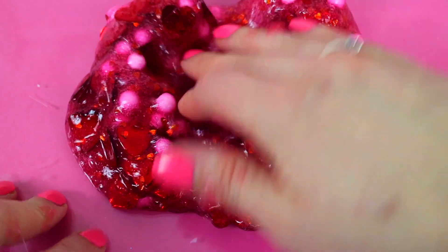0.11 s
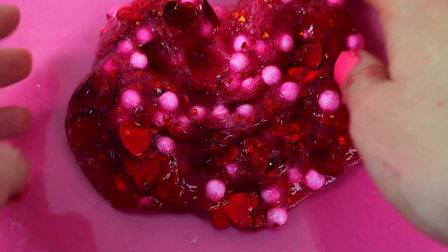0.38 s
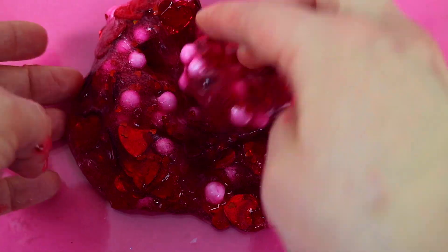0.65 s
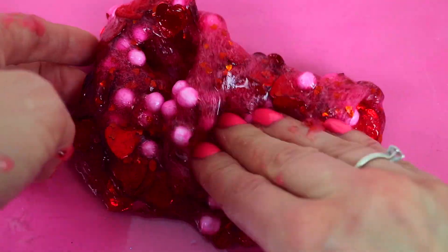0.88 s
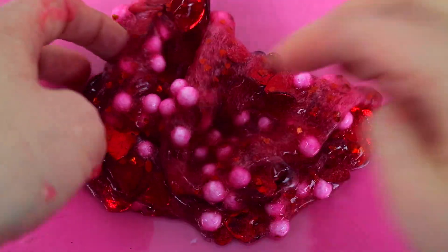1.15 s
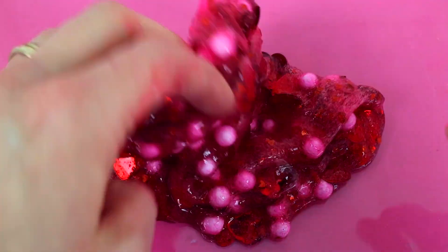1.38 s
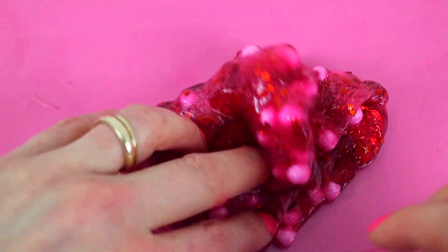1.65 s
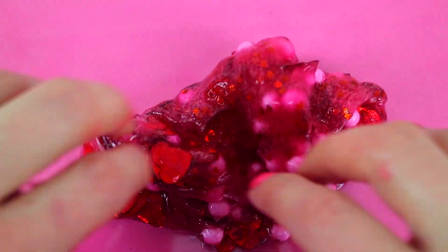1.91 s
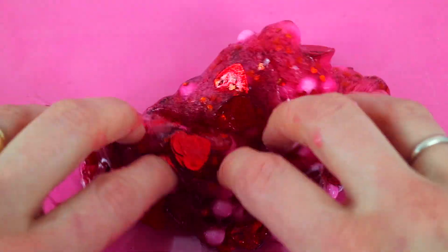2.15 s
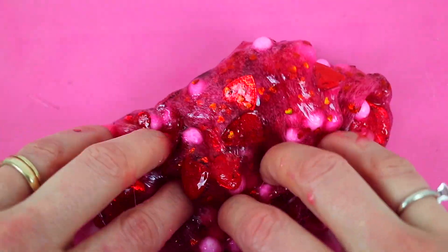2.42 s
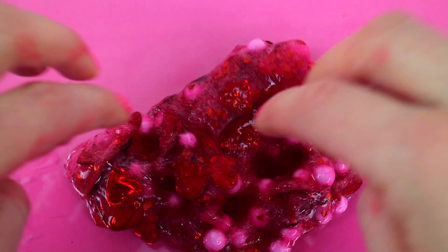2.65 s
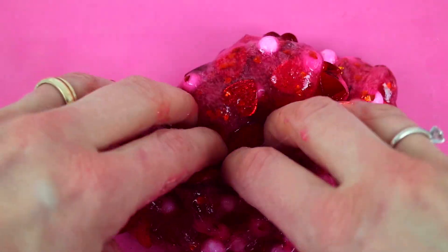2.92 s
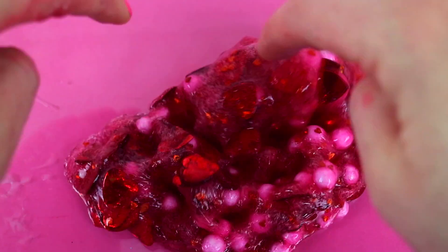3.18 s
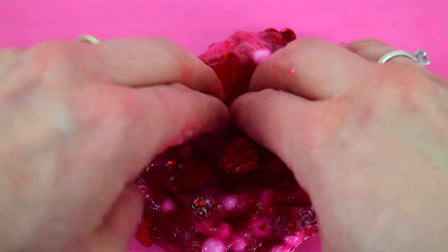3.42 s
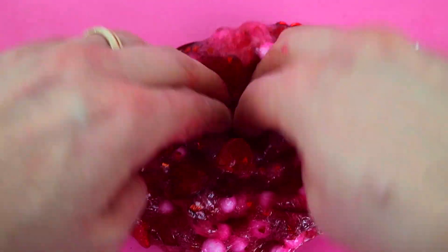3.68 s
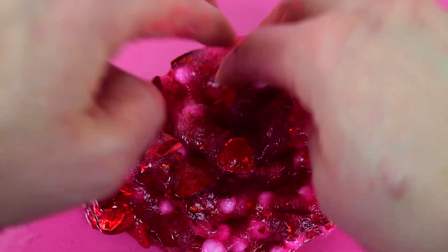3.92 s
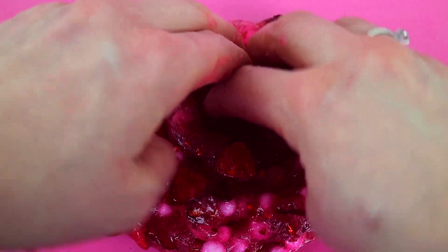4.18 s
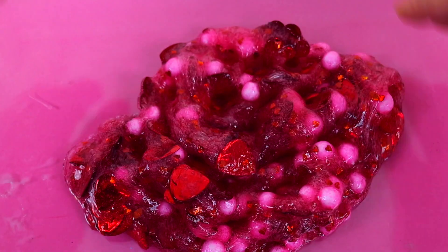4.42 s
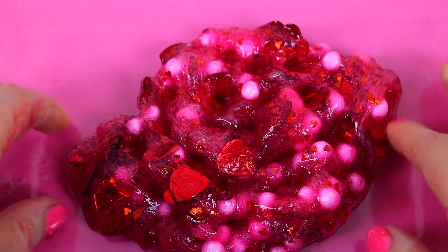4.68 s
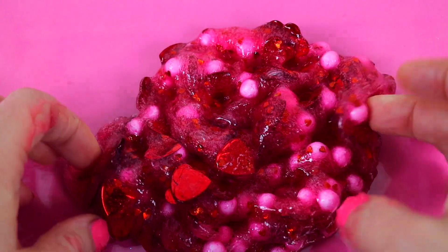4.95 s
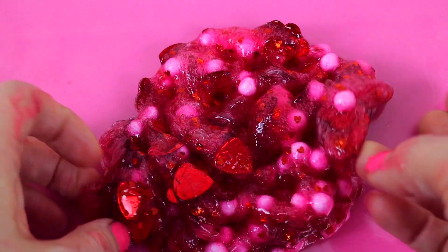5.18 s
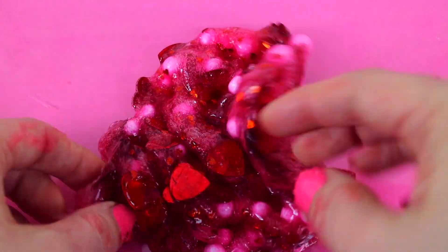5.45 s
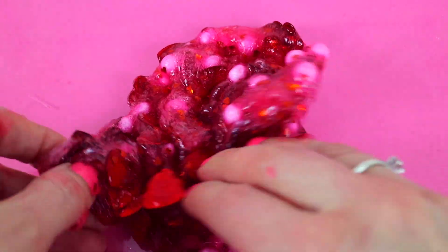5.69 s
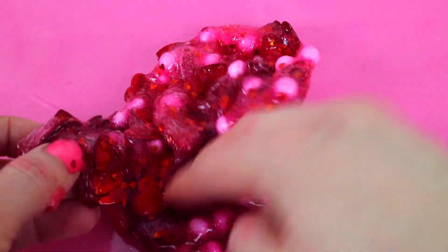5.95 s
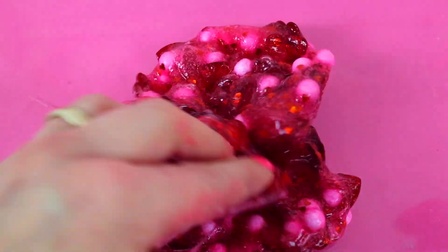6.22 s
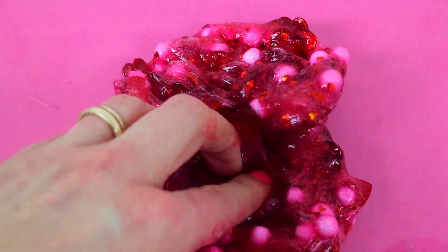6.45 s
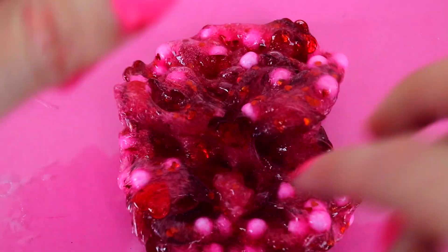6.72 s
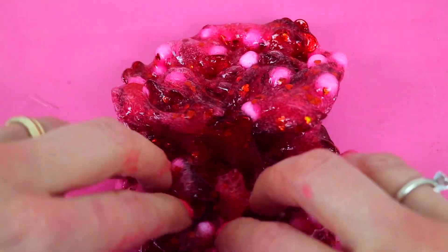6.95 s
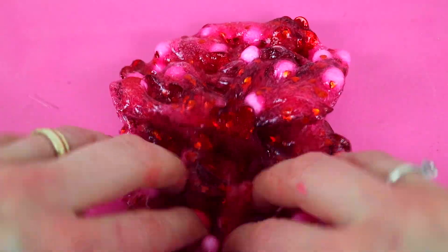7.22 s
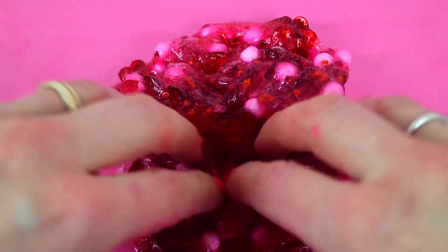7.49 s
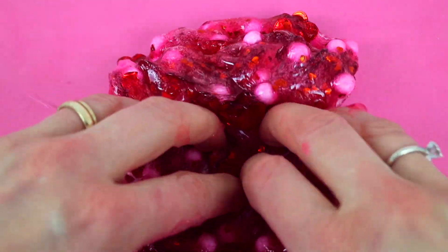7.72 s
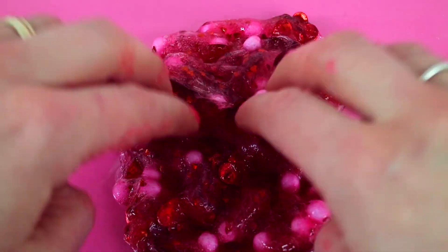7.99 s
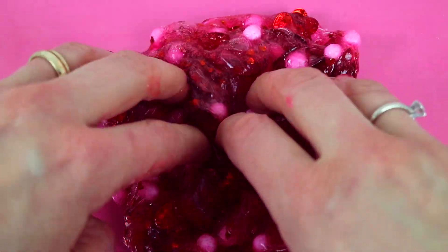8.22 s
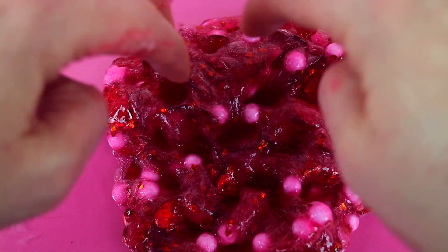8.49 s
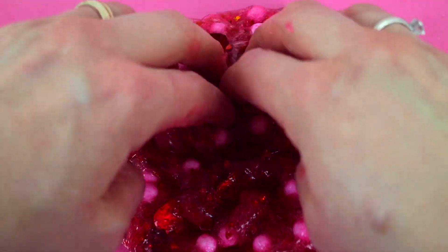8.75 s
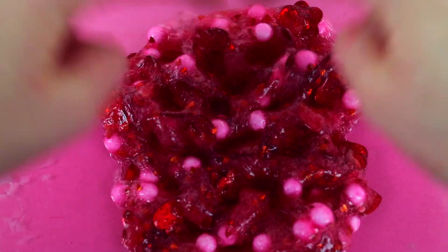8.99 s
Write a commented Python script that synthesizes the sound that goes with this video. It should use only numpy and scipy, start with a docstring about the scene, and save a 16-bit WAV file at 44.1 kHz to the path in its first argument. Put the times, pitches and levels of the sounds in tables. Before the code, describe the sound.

Close-up slime squishing: irregular bursts of crisp crackles, loud air-bubble pops and wet peeling, with soft finger thumps and faint hiss between.

```python
"""Kneading a sticky foam-ball slime

Hands knead, squeeze and pull a sticky slime full of foam balls on a table, close in front of the microphone.
Trapped air pockets burst: shaped noise makes the bright snap, a sagging tone the short hollow ring.
Between them peeling strands crackle, as random clicks exciting short resonances.
Fingers thump the table top, whose modes ring; a small room answers the slime with a short noise tail.
Hiss with a faint narrow hum lies beneath, swelling and sinking."""
import sys
import numpy as np
from scipy import signal
from scipy.fft import rfft, irfft
from scipy.io import wavfile

SR = 44100
rng = np.random.default_rng(int(sys.argv[2]) if len(sys.argv) > 2 else 0)


def wav_out(sig):
    """Save sig, one row per channel (or a flat mono array), as 16-bit PCM at SR to the path in sys.argv[1]."""
    wavfile.write(sys.argv[1], SR, np.round(np.clip(np.atleast_2d(sig).T, -1, 1) * 32767).astype(np.int16))


def voltage_ratio(decibels):
    """Convert decibels (scalar or array-like) to amplitude ratios, 20 dB per decade."""
    exponent = np.asarray(decibels, float) / 20
    return 10 ** exponent


N = 402191  # length [samples]

# Film over an air pocket tearing: (time [s], peak level [dB], pitch [Hz])
FILM_SNAPS = [(0.0134, 0.5, 13000), (0.0647, -7.5, 9200), (0.2079, -11, 11600), (0.5115, -10, 9700),
              (0.5503, -3.5, 6200), (0.5775, -0.5, 3800), (0.622, -9.5, 5350), (0.6893, -5, 11300),
              (0.8532, -8, 14200), (0.948, -20.5, 3000), (0.976, -18, 2470), (0.996, -22, 5500),
              (1.0205, -20, 14020), (1.072, -27, 3330), (1.083, -23.5, 9900), (1.1633, -11.5, 9200),
              (1.1748, -7, 7820), (1.2293, -18.5, 11500), (1.2834, -19, 11100), (1.314, -22, 4540),
              (1.336, -24, 11100), (1.408, -21.5, 3380), (1.4271, -19, 7360), (1.501, -29, 3000),
              (1.538, -21.5, 8600), (1.6227, -23, 13100), (1.662, -4.5, 8700), (1.7165, -7.5, 8140),
              (1.8143, -8.5, 12320), (1.8231, -3, 8560), (1.865, -11, 7000), (1.8794, 4.5, 7420),
              (1.919, -18, 3940), (2.116, -34.5, 5500), (2.274, -20, 10060), (2.299, 10.5, 14600),
              (2.34, -5.5, 8600), (2.4605, -19, 9200), (2.5943, -7, 9790), (2.6135, 6.5, 4450),
              (2.8958, -28, 2800), (2.923, -17.5, 13800), (2.9982, -1, 12000), (3.175, -1, 10800),
              (3.1927, 1, 7800), (3.2133, -1.5, 3830), (3.5239, -30.5, 8850), (3.5604, -28, 5100),
              (3.792, -7, 3820), (3.8214, -14, 7900), (4.0853, -29.5, 5580), (4.239, -12, 11500),
              (4.2496, 0, 10800), (4.34, -2, 9100), (4.9388, -14, 14700), (5.2559, -10.5, 3900),
              (5.3084, -13.5, 12600), (5.362, -23, 3700), (5.3776, -9.5, 13000), (5.4566, -14.5, 11500),
              (5.48, -7.5, 13100), (5.515, -4.5, 13000), (5.573, -13.5, 5150), (5.636, -16.5, 14300),
              (5.53, -20, 6500), (5.664, -19.5, 3160), (5.8251, -15, 10600), (5.8465, -1.5, 8900),
              (5.855, -12, 11170), (5.8744, 15.5, 9160), (6.0356, -5, 10100), (6.0495, -3.5, 4500),
              (6.0538, 2.5, 4070), (6.0747, -1, 6940), (6.194, -24, 7800), (6.2976, -30, 3350),
              (6.386, -30, 3830), (6.418, -29, 4200), (6.498, -32.5, 6000), (6.5424, -37, 3360),
              (6.61, -29.5, 5240), (6.6578, 1.5, 7660), (6.684, -1, 5630), (6.784, -12, 3750),
              (7.1051, -29, 6460), (7.2268, -10.5, 11600), (7.242, -11, 6660), (7.3373, -0.5, 9860),
              (7.3582, -3, 9900), (7.888, -13.5, 7460), (7.909, 0.5, 7550), (8.188, -31, 8000),
              (8.2058, -20, 13500), (8.2605, -8.5, 10800), (8.291, -21.5, 7000), (8.4494, -11, 11700),
              (8.4635, -13, 3400), (8.485, -12, 6100), (8.4899, -2.5, 8400), (8.7442, -7, 12300),
              (8.837, -28, 3460), (8.9611, -22, 8850), (9.03, -14, 10600), (9.0376, -5.5, 5240),
              (9.067, -17, 2800)]
# Larger pockets emptying with a hollow pop: (time [s], peak level of the ring [dB], pitch [Hz])
HOLLOW_POPS = [(0.5797, -10, 1630), (0.6066, -19, 1100), (0.7104, -19.5, 1530), (0.9078, -25.5, 1170),
               (0.92, -22.5, 950), (0.968, -19.5, 1000), (0.99, -20, 785), (1.335, -34, 870),
               (1.367, -30.5, 900), (1.4097, -30, 1340), (1.428, -25.5, 1600), (1.826, -18, 1270),
               (1.8805, -10, 583), (2.369, -27, 1200), (2.598, -13.5, 895), (2.6327, -15.5, 1770),
               (2.641, -12, 864), (3.178, -9.5, 1370), (3.1974, -5, 940), (3.2127, -8.5, 825),
               (3.6929, -13, 765), (3.7915, -14.5, 1576), (5.092, -40, 920), (5.155, -40, 1090),
               (5.2, -29, 1100), (5.248, -27.5, 910), (5.2553, -14.5, 588), (5.306, -30, 966),
               (5.455, -28, 1290), (5.474, -21.5, 1035), (5.565, -23, 1300), (5.581, -24.5, 900),
               (5.636, -29, 1020), (5.8756, -13, 955), (6.0338, -3, 1070), (6.0774, -16, 970),
               (6.641, -22.5, 988), (7.26, -23, 1065), (7.338, -7.5, 832), (7.694, -31, 920),
               (7.7827, -23.5, 670), (7.891, -18, 1010), (7.911, -15.5, 871), (8.241, -22.5, 917),
               (8.306, -29.5, 1200), (8.319, -30.5, 1100), (8.367, -19.5, 880), (8.4497, -12, 936),
               (8.472, -18.5, 1120), (8.4834, -6.5, 727), (8.4889, -7.5, 1280), (8.5034, -12, 950),
               (8.884, -28.5, 793), (9.03, -11, 910), (9.0396, -16.5, 588)]
# Fingers working the slime until they let go:
# (touch time [s], release time [s], crackle level at release [dB], squelch level at release [dB])
KNEAD_STROKES = [(0.059, 0.227, -55, -63), (0.286, 0.561, -57.5, -56), (0.581, 0.662, -39, -42),
                 (0.793, 1.162, -47, -51), (1.237, 1.842, -46.5, -49.5), (1.991, 2.598, -52.5, -55),
                 (2.863, 3.181, -50.5, -51.5), (3.499, 3.783, -55, -55), (4.048, 4.348, -53.5, -54),
                 (4.764, 4.867, -46.5, -52), (4.93, 5.25, -49, -53), (5.257, 5.608, -41.5, -43.5),
                 (5.611, 5.858, -44, -49.5), (5.899, 6.054, -53, -56.5), (6.143, 6.65, -54.5, -60),
                 (7.093, 7.328, -50.5, -62), (7.587, 7.835, -54, -52.5), (8.113, 8.447, -52, -52),
                 (8.806, 9.035, -51.5, -50.5)]
# A finger or fold tearing free: (time [s], crackle level [dB], squelch level [dB])
TEARING_PULLS = [(0.02, -40, -43), (0.22, -33, -40.5), (0.578, -32, -29), (0.707, -33, -37),
                 (1.172, -29, -34.5), (1.427, -40, -49), (1.72, -35, -39), (1.872, -24.5, -32.5),
                 (2.321, -39.5, -47.5), (2.61, -27.5, -30.5), (3.078, -51.5, -58), (3.193, -26, -37.5),
                 (3.815, -28.5, -30.5), (4.361, -30.5, -35.5), (5.098, -41, -45.5), (5.275, -45, -39.5),
                 (5.536, -39, -58), (5.877, -41, -42.5), (6.055, -39, -37.5), (6.639, -40, -48),
                 (6.67, -43.5, -40.5), (7.248, -44.5, -39.5), (7.348, -36, -35.5), (7.8, -43, -47),
                 (7.911, -28.5, -36), (8.35, -51, -38.5), (8.492, -26.5, -26.5), (9.041, -27, -27.5)]
# Strands catching at first touch: (crackle rise [dB/s], squelch rise [dB/s], lone tick rise [dB/s])
CATCH_RATES = (1600, 1200, 1600)
# The last strands letting go: (crackle fall [dB/s], squelch fall [dB/s], lone tick fall [dB/s])
RELEASE_RATES = (348.5, 276.5, 801)
# Slime left alone, before the mixing gains: (crackle level [dB], squelch level [dB], lone tick level [dB])
RESTING_LEVELS = (-69, -75.5, -71.5)
# Fingers pressing on the table: (time [s], knock level before the mode gains [dB])
FINGER_THUMPS = [(0.222, -27), (0.407, -26), (1.18, -25), (2.606, -21), (2.964, -26.5), (3.067, -26.5),
                 (4.195, -28), (4.398, -27.5), (4.756, -26), (4.851, -39.5), (5.255, -29.5), (5.385, -24),
                 (5.66, -28.5), (5.944, -30.5), (6.232, -34), (6.502, -41.5), (7.781, -32.5),
                 (7.828, -31.5), (9.035, -25.5)]
# Modes of the table top: (frequency [Hz], level [dB], time to die by 60 dB [s])
TABLE_MODES = [(121, -4.5, 0.0097), (195.2, -7.5, 0.041), (316, -8.5, 0.025), (560, -0.5, 0.0046)]
# Reverberation of the small room: (band frequency [Hz], time to die by 60 dB [s], tail level [dB])
ROOM_BANDS = [(288, 0.037, -20.5), (878, 0.31, -13), (1970, 0.12, -30), (3940, 0.18, -16),
              (8300, 0.31, -19), (12800, 0.12, -16)]
# Spectrum of the quiet room and microphone hiss: (frequency [Hz], relative density [dB per Hz])
HISS_SPECTRUM = [(30, 4.5), (90, -1.5), (550, -7), (950, -14), (2000, -17.5), (12000, -21.5),
                 (16000, -31.5)]
# The background swelling and sinking: (time [s], level of the hiss [dB])
AIR_SWELLS = [(0, -55.5), (2.298, -59), (3.3, -69.5), (4.0, -64), (4.7, -60.5), (5.8, -58.5), (6.85, -71),
              (9.12, -62)]


def rms_one(x):
    """Normalization: scale a signal to unit root-mean-square value."""
    return x / np.sqrt(np.mean(x ** 2) + 1e-20)


def band(x, low_hz, high_hz):
    """Band-pass filtering by a second-order Butterworth design."""
    edges = np.clip([low_hz, high_hz], 15, .45 * SR)
    return signal.sosfilt(signal.butter(2, edges, "band", fs=SR, output="sos"), x)


def ring(clicks, hz, t60):
    """Damped resonance: a unit click sets a tone of height 1 ringing, with nothing far below it."""
    radius = voltage_ratio(-60 / (t60 * SR))
    angle = 2 * np.pi * hz / SR
    return signal.lfilter([.5, 0, -.5], [1, -2 * radius * np.cos(angle), radius ** 2], clicks + 1e-18)


def drift(rate_hz):
    """Slow random fluctuation of unit spread: white noise through a double low-pass pole."""
    pole = np.exp(-2 * np.pi * rate_hz / SR)
    slow = signal.lfilter([1], [1, -2 * pole, pole ** 2], rng.standard_normal(N + SR))
    return rms_one(slow[SR:])  # the filter has settled after the first second


def add(out, s, sound):
    """Superposition: lay a short sound in at its moment s [s]."""
    at = max(round(s * SR), 0)
    out[at:at + len(sound)] += sound[:N - at]


def snaps(size=768):
    """Film rupture: a hiss swells as the film thins, then a noisy snap is coloured by the opening."""
    lead_s, edge_ratio = .003, 1.42  # swell before the tear [s]; band edge over pitch
    out = np.zeros(N)
    t = np.arange(size) / SR - lead_s
    after = voltage_ratio(-60 * t / 0.0034) + voltage_ratio(-8.0 - 60 * t / 0.011)
    before = voltage_ratio(60 * t / 0.0017) + voltage_ratio(-20.5 + 60 * t / 0.0022)
    shape = np.where(t > 0, after, before)
    noises = rng.standard_normal((len(FILM_SNAPS), size))
    for (s, db, hz), noise in zip(FILM_SNAPS, noises):
        noise[round(lead_s * SR)] = 1.9  # the instant of rupture
        burst = noise * shape
        opening = band(burst, hz / edge_ratio, hz * edge_ratio)
        broad = 0.5 * band(burst, 1500, 16000)
        # the slime below gives a dull tap that grows less than the snap
        tap = voltage_ratio(-6.5 - 0.21 * db) * band(burst, 840, 1900)
        snap = opening + broad + tap
        add(out, s - lead_s, voltage_ratio(db) * snap / np.abs(snap).max())
    return out


def hollows(size=2048):
    """Cavity resonance: the emptied pocket clicks, then rings a few cycles, sagging as it slumps."""
    attack_s, main_cycles = .0012, 5.5  # time constant [s]; cycles to die by 60 dB
    linger_db, linger_cycles = -15, 30  # the wet cavity keeps ringing faintly
    out = np.zeros(N)
    t = np.arange(size) / SR
    noises = rng.standard_normal((len(HOLLOW_POPS), size))
    for (s, db, hz), noise in zip(HOLLOW_POPS, noises):
        tone = np.sin(2 * np.pi * hz * t * (1 - 1.5 * t))
        wet = 0.51 * rms_one(band(noise, hz / 1.93, hz * 2.36))
        decay = voltage_ratio(-60 * t * hz / main_cycles) + voltage_ratio(linger_db - 60 * t * hz / linger_cycles)
        hollow = (tone + wet) * (1 - np.exp(-t / attack_s)) * decay
        click = voltage_ratio(-14.0) * np.diff(noise, prepend=0) * voltage_ratio(-60 * t / 0.004)
        add(out, s - .0008, voltage_ratio(db) * (hollow / np.abs(hollow).max() + click))
    return band(out, 120, 19000)


def effort_db():
    """Energy addition: each knead or pull swells until it lets go, then dies, and their powers add."""
    stretch_s, swell_db = .02, 5  # a pull stretches this long before it tears; gain from touch to release
    t = np.arange(0, N / SR + .001, .001)
    pulls = [(s - stretch_s, s, *db) for s, *db in TEARING_PULLS]
    touch, free, crackle, squelch = np.transpose(list(KNEAD_STROKES) + pulls)[:, :, None]
    yet_to_swell = swell_db * np.clip((free - t) / (free - touch), 0, 1)
    tops = (crackle, squelch, crackle)  # lone ticks follow the crackle
    levels = []
    for top_db, rise, fall, rest_db in zip(tops, CATCH_RATES, RELEASE_RATES, RESTING_LEVELS):
        db = top_db - yet_to_swell
        db = db - rise * np.maximum(touch - t, 0) - fall * np.maximum(t - free, 0)
        power = np.sum(voltage_ratio(2 * db), axis=0) + voltage_ratio(2 * rest_db)
        levels.append(np.interp(np.arange(N) / SR, t, 10 * np.log10(power)))
    return levels


def grains(per_s, low_hz, high_hz, cycles, spread_db, patchy_db, count):
    """Random impulses: clicks of uneven size excite short resonances; strands of like size go in patches."""
    sizes = voltage_ratio(spread_db * np.minimum(rng.exponential(1, N), 4.5)) * rng.choice([-1, 1], N)
    born = rng.random(N) < per_s / SR
    dealt = rng.integers(0, count, N)  # which resonance each click excites
    low_patch, high_patch = drift(17), drift(24)
    clicks = sizes * born / np.sqrt(per_s)  # the level does not follow the rate
    out = 0
    for k, hz in enumerate(np.geomspace(low_hz, high_hz, count)):
        turn = np.pi * k / count  # neighbouring pitches share most of their patches
        patch = voltage_ratio(patchy_db * (np.cos(turn) * low_patch + np.sin(turn) * high_patch))
        out = out + ring(clicks * patch * (dealt == k), hz, cycles / hz) * hz ** 0.82
    return rms_one(out)


def peeling(crackle_db, squelch_db, tick_db):
    """Adhesive release: strands fizz or tick alone, wet folds squelch lower; hard pulls free more at once."""
    full_db, thinning = -40.5, 0.19  # below full_db the fizz drops behind the lone ticks, in dB per dB
    per_s = 5000 * voltage_ratio(0.33 * (crackle_db + 57.0))
    fizz = grains(per_s, low_hz=2700, high_hz=14900, cycles=6.7, spread_db=3.0, patchy_db=6.5, count=10)
    ticks = grains(.025 * per_s, low_hz=1600, high_hz=13000, cycles=6.0, spread_db=3.0, patchy_db=3.0, count=8)
    squelch = grains(.2 * per_s, low_hz=487, high_hz=1600, cycles=10.0, spread_db=3.5, patchy_db=5.5, count=8)
    fizz_db = crackle_db + thinning * np.minimum(crackle_db - full_db, 0)
    return voltage_ratio(fizz_db) * fizz + 0.5 * voltage_ratio(tick_db) * ticks + voltage_ratio(squelch_db) * squelch


def thumps(squelch_db):
    """Modal excitation: a knock and a short wet scuff drive the table modes; shifting slime rumbles them."""
    s, db = np.transpose(FINGER_THUMPS)
    at = (s * SR).astype(int)
    spread = rng.standard_normal((len(s), len(TABLE_MODES)))
    pushes = np.zeros(N)
    pushes[at] = voltage_ratio(db)
    scuff_shape = signal.lfilter([1], [1, -np.exp(-1 / (0.02 * SR))], pushes + 1e-18)
    scuff = scuff_shape * rng.standard_normal(N)
    rumble = voltage_ratio(squelch_db - 26.5) * rng.standard_normal(N)
    out = np.zeros(N)
    for k, (hz, mode_db, t60) in enumerate(TABLE_MODES):
        drive = (rumble + voltage_ratio(-28.0) * scuff) * voltage_ratio(mode_db)
        drive[at] += voltage_ratio(db + mode_db + 0.37 * spread[:, k])
        out += ring(drive, hz, t60)
    return band(out, 30, 700) + voltage_ratio(2.5) * band(scuff, 470, 760)


def room(x):
    """Diffuse reverberation: dense reflections as noise dying away band by band, after a short gap."""
    t = np.arange(SR // 2) / SR
    tail = 0
    for hz, t60, db in ROOM_BANDS:
        noise = band(rng.standard_normal(len(t)), hz / 2.7, hz * 1.18)
        dying = noise * voltage_ratio(-60 * t / t60)
        # divided by the decay length, so a longer tail is not louder
        tail = tail + voltage_ratio(db) * dying / np.sqrt(t60 * SR / (2 * np.log(1000)))
    return signal.fftconvolve(x, tail * (t > .002))[:N]


def air():
    """Stationary noise shaped in frequency, with a faint narrow hum, under a slowly varying level."""
    hum_hz, width_hz, hum_db = 900, 30, -8  # hum level is against the hiss
    hz = np.maximum(np.fft.rfftfreq(N, 1 / SR), 1)
    corner_hz, density_db = np.transpose(HISS_SPECTRUM)
    gain = voltage_ratio(np.interp(np.log(hz), np.log(corner_hz), density_db))
    hiss = irfft(rfft(rng.standard_normal(N)) * gain, N)
    hum = band(rng.standard_normal(N), hum_hz - width_hz / 2, hum_hz + width_hz / 2)
    level_db = np.interp(np.arange(N) / SR, *np.transpose(AIR_SWELLS))
    return voltage_ratio(level_db) * (rms_one(hiss) + voltage_ratio(hum_db) * rms_one(hum))


def scene():
    """Superposition of sources: slime dead centre, only the background differing between the channels."""
    crackle_db, squelch_db, tick_db = effort_db()
    slime = snaps() + hollows() + peeling(crackle_db, squelch_db, tick_db)
    side = voltage_ratio(-11) * band(air(), 110, 9000)  # opposite in sign left and right
    return slime + room(slime) + thumps(squelch_db) + air() + side * [[1], [-1]]


def roll_off(x):
    """The treble ends steeply here."""
    return signal.sosfilt(signal.butter(12, 16710, fs=SR, output="sos"), x)


def record(dry):
    """Band limiting and overload: the top is cut and the loudest pops overload the input."""
    stop_hz = 15700 * 1.04  # 40 dB down from here up
    dull = signal.sosfilt(signal.cheby2(10, 40, stop_hz, fs=SR, output="sos"), dry)
    return roll_off(np.clip(dull, -1, 1))


dry = scene()
out = record(dry)
wav_out(out)
```